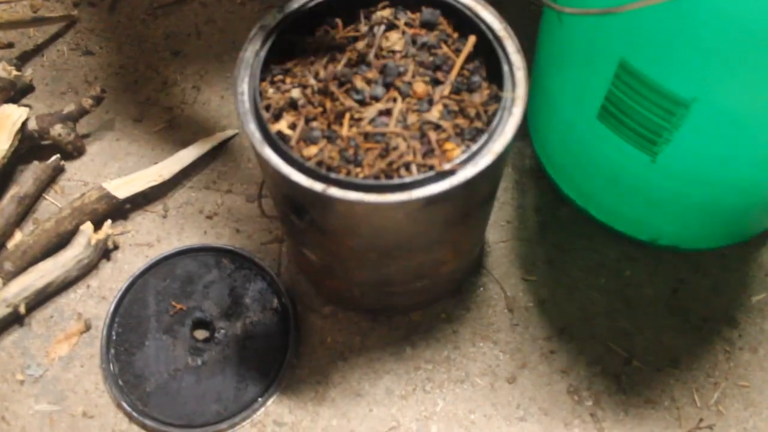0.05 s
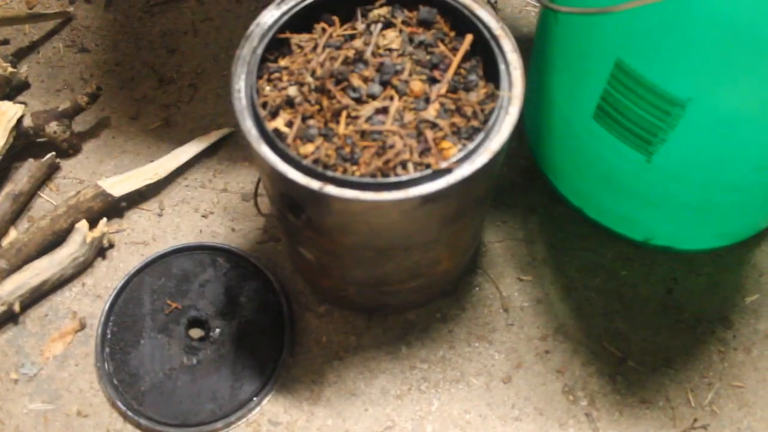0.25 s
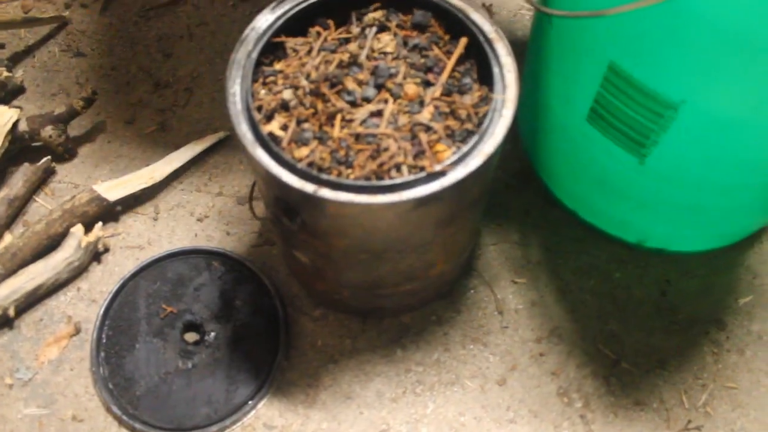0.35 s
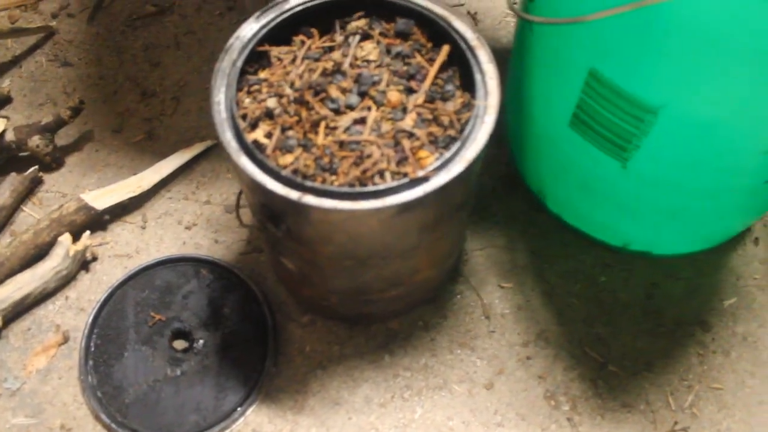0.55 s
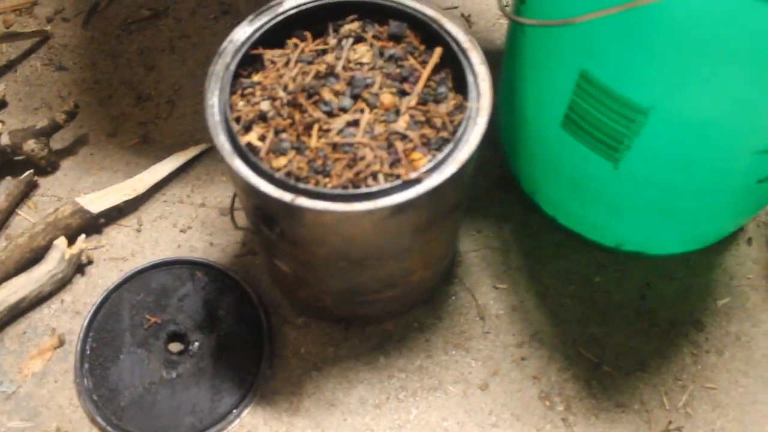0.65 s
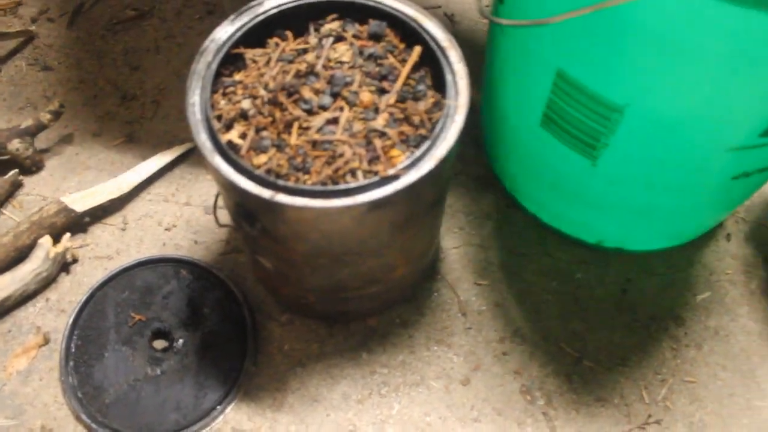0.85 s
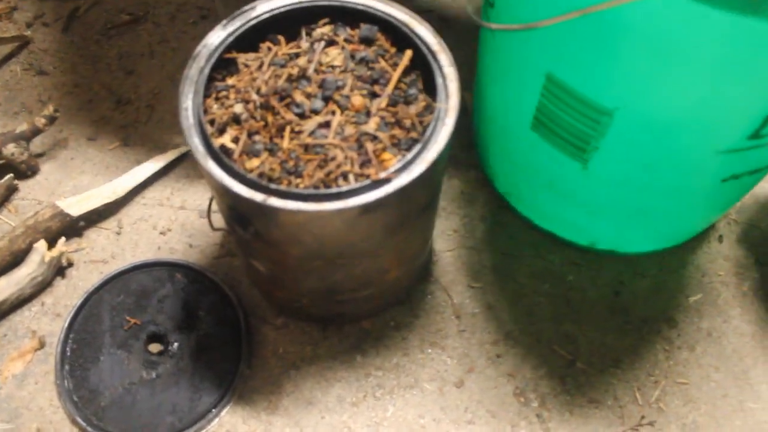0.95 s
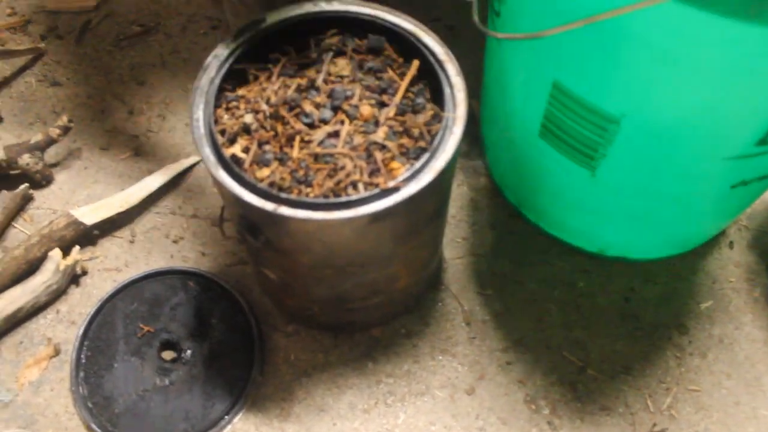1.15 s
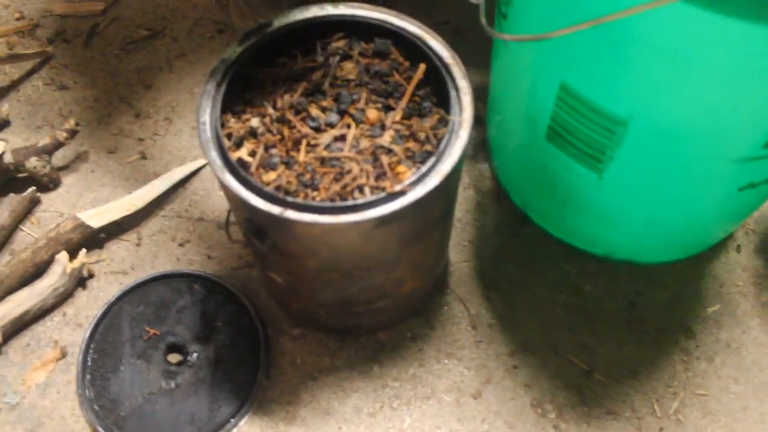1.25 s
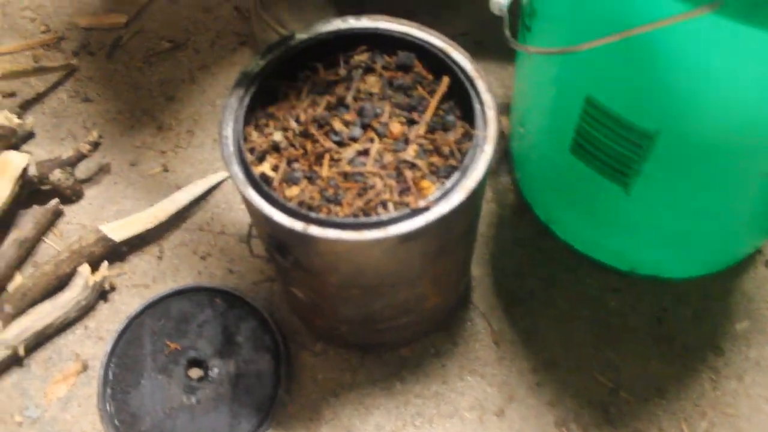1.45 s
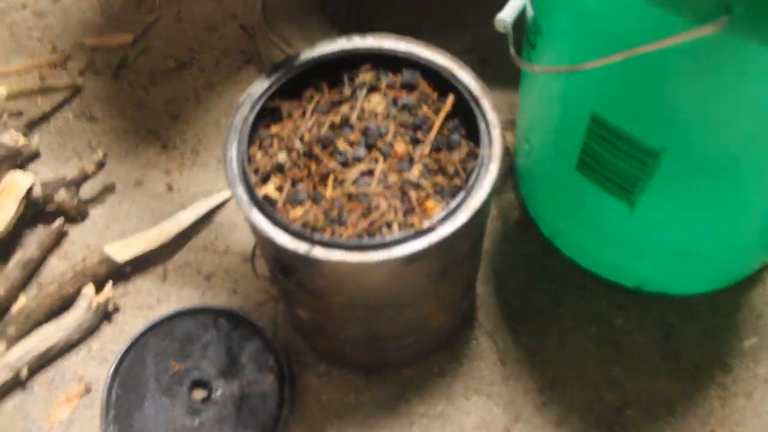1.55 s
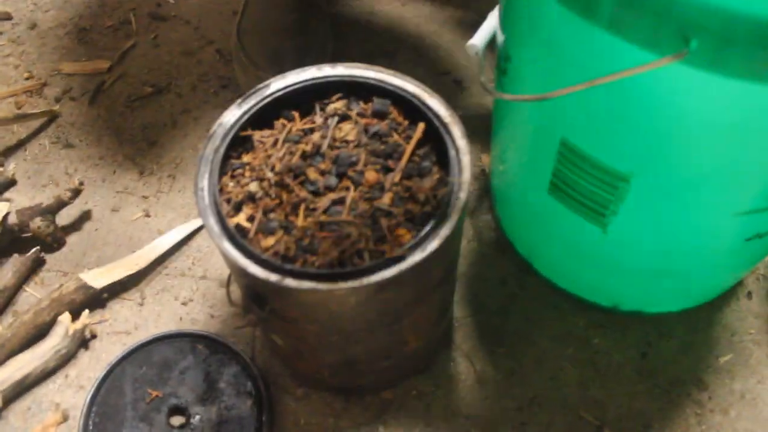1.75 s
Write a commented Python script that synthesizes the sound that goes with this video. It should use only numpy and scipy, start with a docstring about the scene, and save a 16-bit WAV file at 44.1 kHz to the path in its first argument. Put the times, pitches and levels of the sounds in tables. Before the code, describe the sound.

Dry stems and shells are pressed into a metal can: faint taps, a knock with a hollow thump, a long gritty scrape, then brittle snaps and clinks. Close microphone in a small, quiet room.

```python
"""Two light dry taps, then a knock and a hollow thump open a long gritty scrape: dry stems, shells and pits
are pressed down into a metal can, close by in a small room. The load rustles, stems snap, hard bits clink.
Scrape and crackle are random grains over smooth rubbing; snaps, clinks, knocks, thuds, ticks and taps are
coloured noise bursts; squeaks are narrow noise; the base booms in decaying sines. Most pass through the can's
wall ring, its hollow and the room tail."""
import sys
import numpy as np
from scipy import signal
from scipy.fft import rfft, irfft, next_fast_len
from scipy.io import wavfile
from scipy.ndimage import uniform_filter1d, map_coordinates

SR = 44100
rng = np.random.default_rng(int(sys.argv[2]) if len(sys.argv) > 2 else 0)


def dump_mix(stems):
    """Bounce the given channels to the path in sys.argv[1] as a 16-bit WAV at rate SR."""
    frames = np.atleast_2d(stems).T  # one column per channel
    limited = np.clip(frames, -1, 1)  # hard clip at full scale
    pcm = np.round(limited * 32767).astype(np.int16)
    wavfile.write(sys.argv[1], SR, pcm)


N = 79380

# room noise colour: (frequency [Hz], gain [dB])
FLOOR_COLOUR = [(25, -11), (70, -13), (120, 2), (1300, -6.5), (2800, -12), (6000, -14), (16000, -32)]
FLOOR_DB = -56.5
TOP_HZ = 16000

# room decay: (frequency [Hz], T60 [s])
ROOM_T60 = [(150, 0.53), (1500, 0.29), (12000, 0.091)]
# can wall modes: (frequency [Hz], level [dB], T60 [s])
WALL_MODES = [(500, 0, .35), (774, -1, .25), (1019, -5, .25), (1234, -1, .22), (1622, -1, .22),
              (2126, -1, .18), (2342, -5, .16)]
WALL_SPREAD_DB, WALL_DETUNE_RATIO = 2.5, .003  # standard deviations from spot to spot
WALL_DB, HOLLOW_DB, HOLLOW_T60_S, ROOM_DB = -23, 1.5, 0.08, -6

# light dry taps: (time [s], level [dB])
TAPS = [(.0168, -43), (0.1623, -45.5)]
# tap colour: (frequency [Hz], gain [dB])
TAP_COLOUR = [(40, -15), (300, 0.5), (2200, -10), (2850, -4), (3600, -16), (16000, -37)]
TAP_T60_S = 0.023

# thin dry tips cracking: (time [s], level [dB])
TICKS = [(.1485, -51.5), (1.398, -39), (1.707, -43)]
# tick colour: (frequency [Hz], gain [dB])
TICK_COLOUR = [(500, -27), (5000, 5.5), (12000, 2.5)]
TICK_T60_S, TICK_ROOM_DB = 0.022, -5

# load settling: (time [s], level [dB])
THUDS = [(0.373, -38), (0.445, -36), (0.677, -42.5), (1.317, -37), (1.423, -38.5), (1.642, -41.5)]
# thud colour: (frequency [Hz], gain [dB])
THUD_COLOUR = [(40, -48), (115, 8.5), (155, -1), (320, 3.5), (1200, -62)]
THUD_T60_S = 0.17

# can thumping on the ground: (time [s], level [dB])
THUMPS = [(0.2788, -19.5), (1.073, -44.5), (1.239, -46), (1.311, -40), (1.44, -44)]
# low modes of the can's base: (frequency [Hz], level [dB], T60 [s])
BASE_MODES = [(203.4, -1.5, 0.28), (206.4, -5.5, 0.74), (136, -8.5, 0.19)]

# can knocked: (time [s], level [dB], pitch [Hz])
KNOCKS = [(0.2235, -21.5, 1660), (0.2813, -15, 805)]
# colour of a knock pitched at 1 kHz: (frequency [Hz], gain [dB])
KNOCK_COLOUR = [(40, -41), (150, 1), (450, -2.5), (950, 2.5), (1500, -8), (2400, -12.5), (11000, -39.5)]
KNOCK_T60_S = 0.018

# shells and pits clinking: (time [s], level [dB], pitch [Hz])
CLINKS = [(0.288, -24.5, 6930), (0.878, -29, 4270), (1.4154, -23, 5240), (1.4244, -17.5, 2030),
          (1.4548, -31.5, 6860)]
CLINK_T60_S, CLINK_WIDTH_OCT, CLINK_SKIRT_DB = 0.0085, 0.34, -28

# stems rubbing at a pitch: (time [s], length [s], level [dB], pitch [Hz])
SQUEAKS = [(0.318, 0.082, -26, 674), (0.428, 0.065, -29.5, 720)]
SQUEAK_WIDTH_OCT = 0.16

# stems snapping: (time [s], level [dB], body at 600 Hz [dB], edge from 6 kHz up [dB])
SNAPS = [(0.6214, -25, -7, -6), (0.7147, -26.5, -2, -12), (0.8549, -32, -4, 7), (0.9645, -20, -13, -1),
         (1.059, -21.5, -2.5, -1), (1.0939, -24.5, 1, -5), (1.1161, -27, 4, 6), (1.1842, -27, 14.5, 11.5),
         (1.2317, -31, 14, 1), (1.288, -14, 0, 1), (1.3355, -24.5, -0.5, -1.5), (1.424, -14.5, 2.5, 3.5),
         (1.4339, -22.5, 8.5, -12), (1.5256, -23, 3, -1.5), (1.558, -34.5, 0, 1), (1.606, -32, 8, -1.5)]
# snap colour: (frequency [Hz], gain [dB])
SNAP_COLOUR = [(60, -43), (400, -12.5), (650, -2), (1700, 0.5), (2800, -1.5), (6000, -7), (9000, -20),
               (16000, -35.5)]
SNAP_RISE_S, SNAP_T60_S, SNAP_SPIKY = 0.00084, 0.02, 0.48
# final break, level against the tearing of the hardest snap
CRACK_DB, CRACK_DELAY_S, CRACK_T60_S, CRACK_DB_PER_OCT = -6, .0016, 0.0048, 3.5

# fine crackle of dry scraps: (time [s], level [dB])
CRACKLE_LEVEL = [(.12, -71), (.21, -54), (.24, -42), (.325, -37), (.36, -31.5), (.5, -29), (.55, -41.5),
                 (.62, -39), (.82, -45.5), (.88, -40), (1.21, -39), (1.38, -46), (1.47, -41), (1.56, -47),
                 (1.69, -69), (1.77, -56)]
# crackle colour: (frequency [Hz], gain [dB])
CRACKLE_COLOUR = [(100, -74), (1000, -26), (2800, -1), (5000, -1), (7500, -3.5), (9500, -13.5),
                  (16000, -15)]
BIT_LOW_HZ, BIT_HIGH_HZ, BIT_WIDTH_OCT, BIT_SKIRT_DB = 2810, 12800, 0.32, -10.5

# scraping along the wall: (time [s], level [dB])
SCRAPE_LEVEL = [(.222, -86), (.23, -35.5), (.32, -33), (.365, -23), (.43, -25), (.505, -22), (.545, -28.5),
                (.67, -32.5), (.72, -32), (.85, -41), (.91, -56), (.96, -36.5), (1.01, -41.5), (1.12, -36),
                (1.39, -47.5), (1.59, -48), (1.655, -37.5), (1.71, -62), (1.78, -46)]
# scrape colour: (frequency [Hz], gain [dB])
SCRAPE_COLOUR = [(40, -75), (120, -16), (400, -14), (520, -6.5), (780, -5), (1700, 1), (2600, -2.5),
                 (4000, -9), (16000, -38)]
SPOTS = 3

# grain rates hold up to the median level, for each spot or bit size
SCRAPE_GRAINS_PER_S, CRACKLE_GRAINS_PER_S, GRAIN_SPREAD_DB = 350, 98, 4.5
DOUBLING_DB = 4.5  # this much more level doubles the grain rate
RUB_DB = -7  # smooth rubbing against the grains
CLUMP_SCALE_DB, CLUMPS_PER_S = 2.86, 90


def amp(db):
    """Amplitude factor of a level in dB."""
    return 10 ** (np.asarray(db) / 20)


def unit(x):
    """Scale to an RMS of one."""
    return x / np.sqrt(np.mean(x ** 2) + 1e-20)


def norm(x):
    """Scale to an energy of one."""
    return x / (np.linalg.norm(x) + 1e-20)


def along(points, hz):
    """Interpolate (frequency [Hz], value) points on a log axis."""
    point_hz, values = np.transpose(points)
    return np.interp(np.log(hz + 1), np.log(point_hz + 1), values)


def hump(hz, pitch_hz, width_oct):
    """Gain in dB of one resonance."""
    return -10 * np.log10(1 + (np.log2((hz + 1) / pitch_hz) / width_oct) ** 4)


def fade(t, t60_s):
    """Exponential decay by 60 dB in t60_s."""
    return np.exp(-np.log(1000) * t / t60_s)


def clock():
    """Half a second of sample times: the life of one sound."""
    return np.arange(SR // 2) / SR


def add(track, s, sound):
    """Mix a sound into the track at s seconds."""
    part = track[max(round(s * SR), 0):][:len(sound)]
    part += sound[:len(part)]


def coloured(x, gain_db):
    """Minimum-phase filter, via the folded cepstrum, with gain_db(hz)."""
    m = 2 * next_fast_len(len(x) // 2 + SR // 20)
    log_gain = np.log(amp(gain_db(np.fft.rfftfreq(m, 1 / SR))))
    cepstrum = irfft(log_gain, m)
    cepstrum[1:m // 2] *= 2
    cepstrum[m // 2 + 1:] = 0
    response = np.exp(rfft(cepstrum))
    return irfft(rfft(x, m) * response, m)[:len(x)]


def even(x):
    """Flatten the broad spectral peaks of a short noise so that it has no pitch of its own."""
    power = np.abs(uniform_filter1d(np.abs(rfft(x)) ** 2, size=160)) + 1e-12
    bin_hz = np.fft.rfftfreq(len(x), 1 / SR)
    return norm(coloured(x, lambda hz: -10 * np.log10(np.interp(hz, bin_hz, power))))


def burst(t60_s, rise_s, spiky, gain_db):
    """A dying run of tiny fractures, with the energy of 5 ms at full level."""
    t = clock()
    fractures = rng.standard_normal(len(t)) * np.exp(spiky * rng.standard_normal(len(t)))
    envelope = np.minimum(t / rise_s, 1) * fade(t, t60_s)
    return norm(coloured(even(fractures * envelope), gain_db)) * np.sqrt(.005 * SR)


def space():
    """Direct sound, quick echoes in the can's hollow and a fresh room tail."""
    t = clock()
    hz, frame_s, spectrum = signal.stft(rng.standard_normal(len(t)), SR, nperseg=256)
    decay = fade(frame_s, along(ROOM_T60, hz)[:, None])
    tail = signal.istft(spectrum * decay, SR, nperseg=256)[1][:len(t)]
    hollow = rng.standard_normal(len(t)) * fade(t, HOLLOW_T60_S)
    return (t == 0) + amp(HOLLOW_DB) * norm(hollow) + amp(ROOM_DB) * norm(tail)


def wall_ring():
    """Wall modes ring as decaying cosines, each time with new levels and slight detuning for the spot."""
    t = clock()
    ring = np.zeros(len(t))
    for hz, db, t60_s in WALL_MODES:
        level_offset, detune = rng.standard_normal(2)
        mode_hz = hz * (1 + WALL_DETUNE_RATIO * detune)
        mode = np.cos(2 * np.pi * mode_hz * t) * fade(t, t60_s)
        ring += amp(db + WALL_SPREAD_DB * level_offset) * norm(mode)
    return ring


def in_can(x, ring_db):
    """A sound inside the can: the wall rings along and the space answers."""
    response = even(space()) + amp(WALL_DB + ring_db) * wall_ring()
    return signal.fftconvolve(x, norm(response))[:len(x)]


def grains(level, per_s, colour):
    """Random tiny contacts over smooth rubbing, in clumps, denser as their level rises."""
    t = np.arange(N) / SR
    level_db = np.interp(t, *np.transpose(level))
    excess_db = np.maximum(level_db - np.median(level_db), 0)
    chance = np.minimum(per_s / SR * 2 ** (excess_db / DOUBLING_DB), 1)
    sizes = amp(GRAIN_SPREAD_DB * np.clip(rng.standard_normal(N), -2, 2)) * rng.choice([-1, 1], N)
    swing = map_coordinates(rng.uniform(-3.3, 3.4, SR // 2), [t * CLUMPS_PER_S])
    clumps = amp(CLUMP_SCALE_DB * swing)
    hits = (rng.random(N) < chance) * sizes / np.sqrt(chance)  # density must not change the power
    contacts = unit(hits) + amp(RUB_DB) * rng.standard_normal(N)
    return amp(level_db) * unit(coloured(contacts * clumps, lambda hz: along(colour, hz)))


def floor():
    """Quiet steady room noise."""
    return amp(FLOOR_DB) * unit(coloured(rng.standard_normal(N), lambda hz: along(FLOOR_COLOUR, hz)))


def taps():
    """Light taps before the pressing starts: dry noise bursts with an instant attack."""
    out = np.zeros(N)
    for s, db in TAPS:
        tap = burst(TAP_T60_S, rise_s=1 / SR, spiky=0, gain_db=lambda hz: along(TAP_COLOUR, hz))
        add(out, s, amp(db) * tap)
    return out


def ticks():
    """Thin tips crack at the top of the heap: short and bright, direct sound plus a weaker can response."""
    out = np.zeros(N)
    for s, db in TICKS:
        tick = burst(TICK_T60_S, rise_s=0.00044, spiky=0.17, gain_db=lambda hz: along(TICK_COLOUR, hz))
        add(out, s, amp(db) * (tick + amp(TICK_ROOM_DB) * in_can(tick, ring_db=0)))
    return out


def thuds():
    """The load settles with dull low bursts."""
    out = np.zeros(N)
    for s, db in THUDS:
        thud = burst(THUD_T60_S, rise_s=0.003, spiky=0, gain_db=lambda hz: along(THUD_COLOUR, hz))
        add(out, s, amp(db) * thud)
    return out


def thumps():
    """The can thumps on the ground and its base modes boom with a soft onset."""
    out, t = np.zeros(N), clock()
    boom = sum(amp(db) * np.sin(2 * np.pi * hz * t) * fade(t, t60_s) for hz, db, t60_s in BASE_MODES)
    onset = 1 - np.exp(-t / .005)
    for s, db in THUMPS:
        add(out, s, amp(db) * boom * onset)
    return out


def knocks():
    """The can is knocked: short bursts whose colour is shifted to the pitch of each knock."""
    out = np.zeros(N)
    for s, db, pitch_hz in KNOCKS:
        colour = lambda hz: along(KNOCK_COLOUR, hz * 1000 / pitch_hz)
        knock = burst(KNOCK_T60_S, rise_s=0.00027, spiky=0.057, gain_db=colour)
        add(out, s, amp(db) * in_can(knock, ring_db=-7.0))
    return out


def clinks():
    """Hard bits knock together and ring briefly around one pitch."""
    out = np.zeros(N)
    for s, db, pitch_hz in CLINKS:
        distance = lambda hz: np.log2((hz + 1) / pitch_hz) / CLINK_WIDTH_OCT
        colour = lambda hz: CLINK_SKIRT_DB * (1 - 1 / (1 + distance(hz) ** 2 / 2))
        clink = burst(CLINK_T60_S, rise_s=.0006, spiky=.5, gain_db=colour)
        add(out, s, amp(db) * in_can(clink, ring_db=-4))
    return out


def squeaks():
    """Stems rub on the wall: narrow noise around one pitch in a brief, rough swell."""
    out = np.zeros(N)
    for s, length_s, db, pitch_hz in SQUEAKS:
        noise = rng.standard_normal(SR // 2)
        rub = unit(coloured(noise, lambda hz: hump(hz, pitch_hz, SQUEAK_WIDTH_OCT)))
        swell = np.sin(np.pi * np.minimum(clock() / length_s, 1))
        add(out, s, amp(db) * in_can(rub * swell, ring_db=-26))
    return out


def snaps():
    """Fibres tear, then the stem parts with one crack; thick stems have more body, thin ones more edge."""
    out = np.zeros(N)
    hardest_db = max(row[1] for row in SNAPS)
    for s, db, body_db, edge_db in SNAPS:
        tilt = [(200, 0), (600, body_db), (1800, 0), (6000, edge_db)]
        colour = lambda hz: along(SNAP_COLOUR, hz) + along(tilt, hz)
        brighter = lambda hz: colour(hz) + CRACK_DB_PER_OCT * np.log2(hz + 1)
        tearing = burst(SNAP_T60_S, SNAP_RISE_S, SNAP_SPIKY, colour)
        add(out, s, amp(db) * in_can(tearing, ring_db=-6))
        crack = burst(CRACK_T60_S, rise_s=1 / SR, spiky=0, gain_db=brighter)
        crack_db = db + CRACK_DB + (db - hardest_db) / 2  # weak stems part softly
        add(out, s + CRACK_DELAY_S, amp(crack_db) * crack)
    return out


def crackle():
    """Fine bits on top crackle, each size at its own pitch, part dry and part through the can."""
    bits = np.zeros(N)
    for pitch_hz in np.geomspace(BIT_LOW_HZ, BIT_HIGH_HZ, 2 * SPOTS):
        resonance = lambda hz: np.maximum(hump(hz, pitch_hz, BIT_WIDTH_OCT), BIT_SKIRT_DB)
        bits += coloured(grains(CRACKLE_LEVEL, CRACKLE_GRAINS_PER_S, CRACKLE_COLOUR), resonance)
    return (bits / 2 + in_can(bits, ring_db=-14)) / 2


def scrape():
    """The load scrapes down the wall at several spots, each with its own grains and wall ring."""
    out = np.zeros(N)
    for _ in range(SPOTS):
        out += in_can(grains(SCRAPE_LEVEL, SCRAPE_GRAINS_PER_S, SCRAPE_COLOUR), ring_db=-1.5)
    return out / np.sqrt(SPOTS)


def scene():
    """Everything sits in the centre."""
    mid = floor() + taps() + ticks() + thuds() + thumps() + knocks()
    mid += clinks() + squeaks() + snaps() + crackle() + scrape()
    return np.array([mid, mid])


def record(dry):
    """The recorder keeps nothing above its band limit."""
    m = next_fast_len(N + SR // 2)
    in_band = np.fft.rfftfreq(m, 1 / SR) < TOP_HZ
    return irfft(rfft(dry, m) * in_band, m)[:, :N]


dry = scene()
out = record(dry)
dump_mix(out)
```